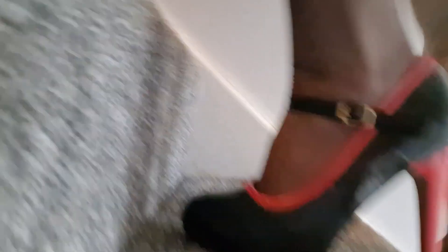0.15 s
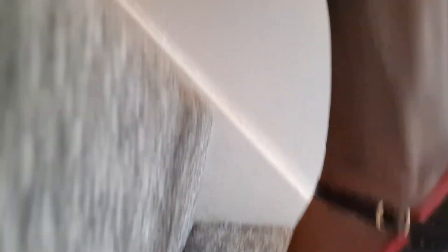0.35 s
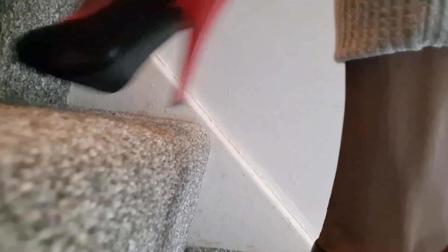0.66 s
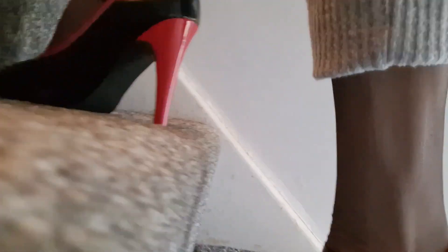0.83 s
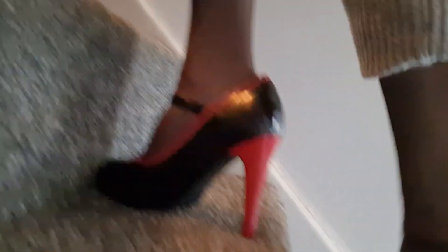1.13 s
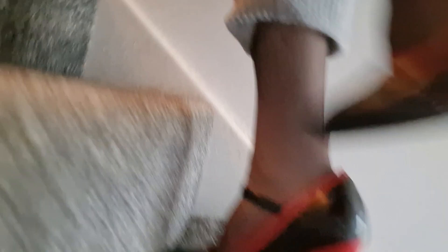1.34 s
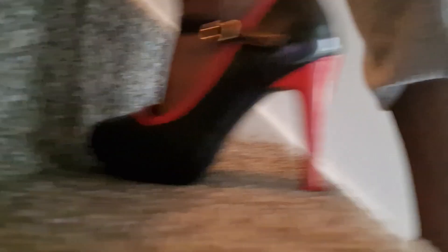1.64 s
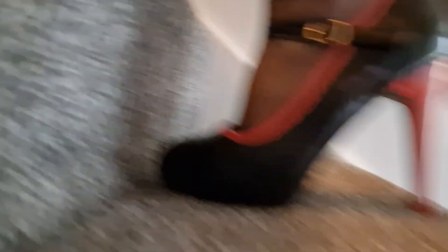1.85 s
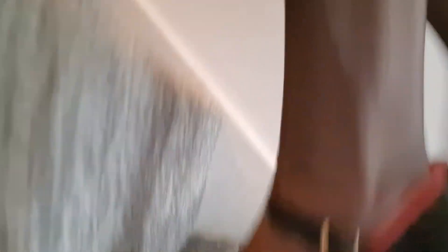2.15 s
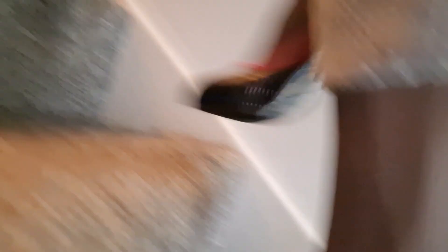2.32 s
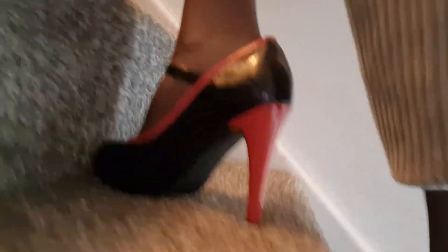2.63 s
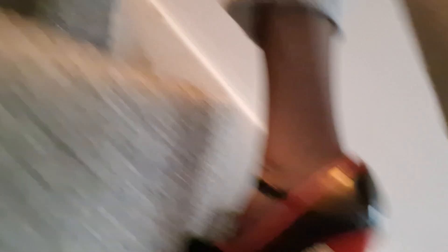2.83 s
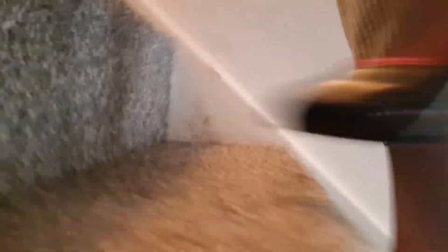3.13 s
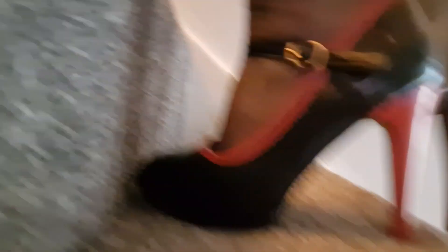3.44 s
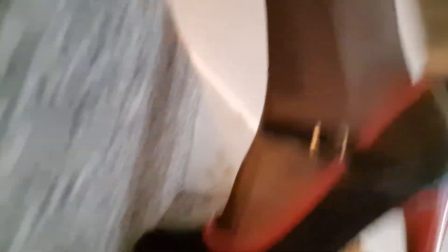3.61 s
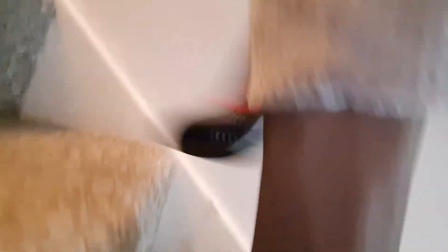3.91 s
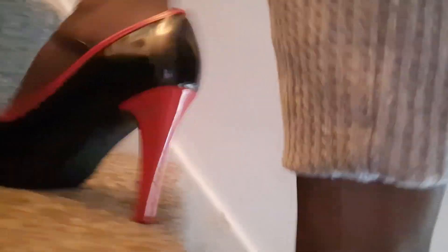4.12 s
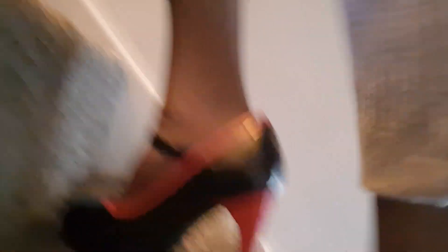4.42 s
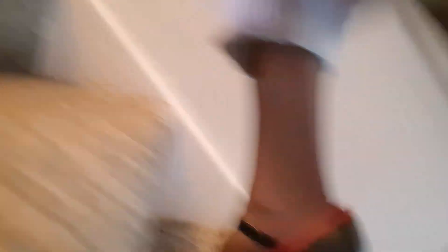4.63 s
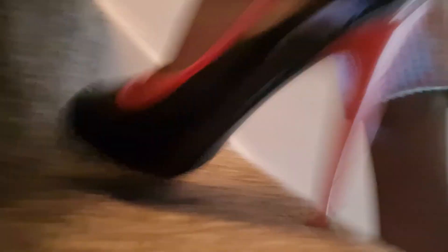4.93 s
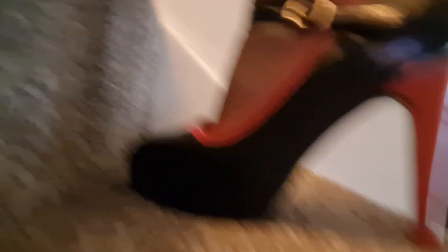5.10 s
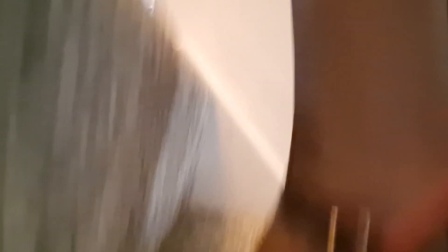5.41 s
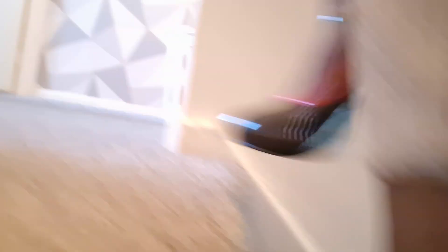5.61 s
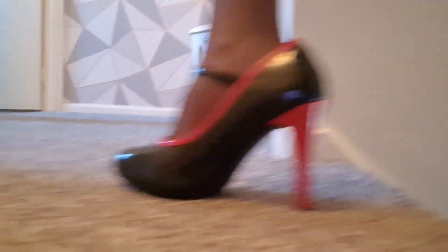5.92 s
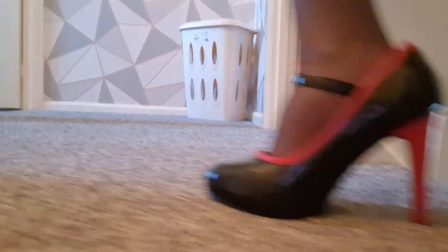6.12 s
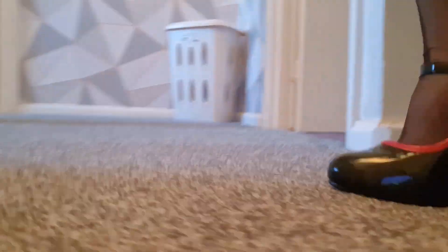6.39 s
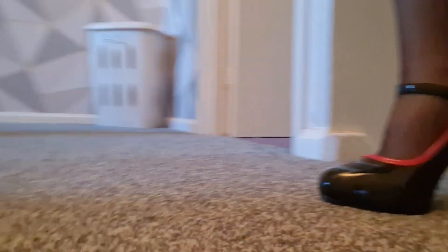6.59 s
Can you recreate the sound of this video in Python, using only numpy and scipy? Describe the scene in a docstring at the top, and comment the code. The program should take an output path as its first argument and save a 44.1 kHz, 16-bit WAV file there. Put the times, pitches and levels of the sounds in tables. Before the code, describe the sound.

Close to the feet in a narrow indoor stairwell, platform high heels climb carpeted wooden stairs at an even walking pace. A strong muffled thud opens at 0 seconds, with a small click at 0.2. Further soft, bassy landings come near 0.85, 1.75, 2.63, 3.43, 4.22 and 5.1, each with low rumbling of the flight and a grainy scuff of carpet pile. Dry wooden knocks and hollow shoe clicks follow irregularly, clearest at 1.93, 3.47 and 5.23; a crisp strap-like snap lands at 3.61. Slipping soles chirr briefly, notably at 4.64 and 5.93. Between steps, knitted trousers swish and nylon hisses very faintly. A lighter, duller step reaches the landing at about 5.95, with a small knock at 6.15. Then the sound settles into faint steady house quiet, with one soft scuff near 6.5 and a barely audible tick at 6.7. Short, close reverberation surrounds the steps.

```python
"""Platform heels on carpeted stairs

Someone in platform high heels climbs a carpeted wooden staircase to a landing, the microphone close to the feet.
Soles land with a muffled thud (struck tread and flight modes) and scuff the pile (grainy coloured noise).
Heels and loaded boards knock and click: struck modes with short noise bursts; slipping soles chirr.
Knitted trouser legs swish, nylon hisses and the flight rumbles, all as swelling noise; a strap snaps once.
The narrow stairwell rings briefly over the steady quiet of the house."""
import sys
import numpy as np
from scipy import signal
from scipy.fft import rfft, irfft, next_fast_len
from scipy.io import wavfile

SR = 44100
rng = np.random.default_rng(int(sys.argv[2]) if len(sys.argv) > 2 else 0)


def transcribe(u):
    """Save the signal u as a 16-bit wav file named by the first command-line argument.

    u: samples, shape (n,) or (channels, n), limited to [-1, 1]; the rate is SR.
    q: integer samples, one column per channel.
    """
    v = np.clip(np.atleast_2d(u).T, -1, 1)
    q = np.round(v * 32767).astype(np.int16)
    wavfile.write(sys.argv[1], SR, q)


N = 297851
TIME = np.arange(N) / SR


def from_db(db):
    """Decibels to gain."""
    return 10 ** (np.asarray(db) / 20)


def rms_one(x):
    """Scale to unit rms."""
    return x / np.sqrt(np.mean(x ** 2) + 1e-20)


def at_hz(points, hz):
    """Read a table on a log-frequency axis."""
    f, value = np.transpose(points)
    return np.interp(np.log(np.maximum(hz, 1)), np.log(f), value)


def add(track, s, sound):
    """Mix a sound into a track from time s on."""
    i = max(int(round(s * SR)), 0)
    track[..., i:i + sound.shape[-1]] += sound[..., :N - i]


def swell(peak_s):
    """A quick rise to 1 and a slower fall."""
    age = TIME[:SR // 2] / peak_s
    return age * np.exp(1 - age)


def stroke(s, half_s):
    """A smooth pass, at its height at time s."""
    return np.exp(-.5 * np.minimum(((TIME - s) / half_s) ** 2, 100))


def surge(s, rise_s, fall_s):
    """A rise to 1 at time s, then a steady dying away."""
    return np.where(TIME < s, stroke(s, rise_s), np.exp(-np.abs(TIME - s) / fall_s))


def pan(stereo, left_db):
    """Tilt the balance: left against right in dB."""
    return stereo * from_db([[left_db / 2], [-left_db / 2]])


def place(sound, left_db, lag_s):
    """Mono to stereo: left_db favours the left port, lag_s delays the right."""
    t = TIME[:len(sound)]
    return pan(np.array([sound, np.interp(t - lag_s, t, sound, left=0)]), left_db)


# Likeness of left and right. Each row: frequency in Hz, correlation.
LEFT_RIGHT_LIKENESS = [(60, 0.95), (150, 0.94), (300, 0.95), (600, 0.2), (1500, 0.05), (4000, 0.061),
                       (15000, 0.093)]


def noise(spectrum):
    """Stereo noise of a given colour, alike in the bass and nearly unrelated in the treble; rms 1."""
    size = next_fast_len(N)
    hz = np.arange(size // 2 + 1) * SR / size
    mid, side = rfft(rng.standard_normal((2, size))) * from_db(at_hz(spectrum, hz))
    alike = np.clip(at_hz(LEFT_RIGHT_LIKENESS, hz), -1, 1)
    spectra = np.sqrt(1 + alike) * mid + np.sqrt(1 - alike) * side * [[1], [-1]]
    return rms_one(irfft(spectra, size)[:, :N])


def grain(per_s, depth_db):
    """Uneven gain of surfaces catching and letting go; rms 1."""
    catches = np.clip(rng.standard_normal(N), -2, 2)
    return rms_one(from_db(depth_db * np.interp(TIME * per_s, np.arange(N), catches)))


def ring(modes, t):
    """Free decay of struck modes."""
    return sum(from_db(db - 60 * t / t60) * np.sin(2 * np.pi * hz * t) for hz, db, t60 in modes)


def soften(sound, contact_s):
    """A rounded push instead of a sharp blow: the longer the contact, the duller the sound."""
    push = np.sin(np.pi * np.minimum(TIME[:int(contact_s * SR) + 2] / contact_s, 1)) ** 2
    return signal.fftconvolve(sound, push / push.sum())[:len(sound)]


def band_pass(sound, low_hz, high_hz):
    """Second-order Butterworth band-pass."""
    return signal.sosfilt(signal.butter(2, [low_hz, high_hz], "band", fs=SR, output="sos"), sound)


# Soles landing or pushing off. Each row: start in seconds, level in dB, contact time in seconds,
# tread pitch in Hz, share passed to the flight in dB.
SOLE_THUDS = [(0.004, -13.5, 0.0067, 101.5, -8.5), (0.162, -28, 0.008, 107, -6),
              (0.853, -20.5, 0.0082, 74, -2), (1.001, -26.5, 0.011, 53.3, -3), (1.661, -37, 0.0094, 51, 2),
              (1.757, -32.5, 0.0081, 109, -2), (1.946, -22, 0.0026, 124, -10.5),
              (2.633, -39.5, 0.0033, 84, 1), (2.748, -38, .003, 118, -11), (3.439, -36.5, 0.011, 60, 9.5),
              (3.491, -38, 0.012, 120, -29), (3.801, -32, 0.0038, 77, -11.5), (4.198, -27, 0.0063, 92, -6),
              (4.257, -19.5, 0.0057, 112, -10.5), (4.732, -31, 0.0017, 84, -11),
              (5.093, -20, 0.0038, 130, -8.5), (5.104, -15, 0.0044, 86, -9.5), (5.23, -40, 0.0021, 122, -4),
              (5.964, -28, 0.0055, 74.6, -18.5)]
# Resonances of the whole flight. Each row: frequency in Hz, level in dB, T60 in seconds.
FLIGHT_MODES = [(37.5, -22, 0.055), (60.2, -1.5, 0.21), (90, -15.5, 0.075), (117, -10.5, 0.67),
                (136.9, -2, 0.24), (171, -5, 0.16), (216, -4, 0.17), (257.6, -5.5, 0.12)]


def thuds(tread_t60_s=0.081, left_db=1.5, lag_s=-.00022):
    """The carpet cushions the sole; the tread bounces briefly and shakes the whole flight."""
    out, t = np.zeros(N), TIME[:SR]
    flight = ring(FLIGHT_MODES, t)
    for s, db, contact_s, tread_hz, flight_db in SOLE_THUDS:
        wood = ring([(tread_hz, 0, tread_t60_s)], t) - from_db(flight_db) * flight
        add(out, s, from_db(db) * soften(wood, contact_s))
    return place(out, left_db, lag_s)


# Hard contacts of heel and boards. Each row: start in seconds, wood level in dB, shoe level in dB,
# shoe pitch in Hz, stem clack in dB, tick in dB, time to full grip in seconds, left against right in dB.
HARD_CONTACTS = [(0.0003, -44.5, -59.5, 1550, -48, -49.5, 0.00057, -6.5),
                 (0.077, -44.5, -57, 1440, -66, -85, 0.001, 8),
                 (0.2098, -40, -48, 1835, -49, -49, 0.00047, 2.5),
                 (0.434, -63, -43.5, 1067, -56, -70, 0.0024, 3),
                 (1.0392, -55, -59, 1470, -76, -64, 0.0012, 4),
                 (1.7417, -47, -61, 990, -75, -70, 0.00098, 14),
                 (1.775, -43, -58.5, 1030, -67, -81, 0.0011, 10),
                 (1.871, -34.5, -51, 1470, -60, -65, 0.0017, 1),
                 (1.884, -50, -49.5, 1480, -56.5, -72, 0.0016, 3),
                 (1.9290, -25.5, -28.5, 1480, -36.5, -33.5, 0.00099, 5.5),
                 (1.948, -36.5, -43, 1600, -58, -43, 0.00074, -7),
                 (2.6322, -51, -68, 2100, -71, -58, 0.00094, 21),
                 (2.7046, -61, -58, 1080, -72, -74, 0.0018, -1),
                 (2.7414, -32, -41.5, 1000, -80, -76, .0009, 6),
                 (2.7961, -47.5, -57, 1630, -60, -56, 0.0007, 1),
                 (2.8621, -58, -72, 1480, -62, -56.5, 0.00045, 1),
                 (3.4373, -34, -55, 830, -69, -71, 0.0016, 11),
                 (3.4702, -24, -40.5, 885, -36.5, -49, .001, 2),
                 (3.4966, -35, -40.5, 956, -52, -47, 0.0016, 1),
                 (3.6010, -30, -42, 1007, -51, -43.5, 0.0017, 2.5),
                 (4.177, -34.5, -66, 1000, -83, -81, 0.0021, 5),
                 (4.382, -46, -55, 990, -54, -54, .0014, -2),
                 (4.5537, -35.5, -64.5, 990, -77, -81, 0.0026, 4),
                 (4.6372, -27.5, -46.5, 960, -54, -77, 0.0019, 3),
                 (4.6540, -44, -56.5, 1570, -68, -84, 0.00047, 17),
                 (5.1157, -36, -50.5, 1800, -40.5, -45, 0.00055, 5),
                 (5.1244, -42, -49, 1850, -48, -59, 0.0014, -7),
                 (5.1907, -56, -76, 2240, -66, -62, .0005, 9),
                 (5.2287, -20, -34.5, 1072, -34, -37, .0011, 3),
                 (5.4705, -42.5, -77, 991, -86, -84, 0.0017, 4),
                 (6.1520, -44.5, -91, 1310, -68, -86, 0.0014, 5),
                 (6.6943, -58.5, -76, 1540, -66, -71, 0.001, -3)]
# Resonances of one board. Each row: frequency in Hz, level in dB, T60 in seconds.
BOARD_MODES = [(206, -15, 0.036), (305.4, -2, 0.025), (369.5, -21.5, 0.087), (436, -11.5, 0.028),
               (505, -15.5, 0.048), (648, -6, 0.03), (830, -25, 0.2), (970, -40, .02)]
# Resonances of the shoe. Each row: multiple of its pitch, level in dB, T60 in seconds.
SHOE_MODES = [(0.501, -5, 0.0091), (0.719, -9, 0.046), (1.002, 3.5, 0.022), (2.12, -9, 0.02),
              (3.05, -19.5, .014)]
# Ring of the heel stem. Each row: frequency in Hz, level against its clack in dB, T60 in seconds.
STEM_MODES = [(3200, 1.5, 0.0051)]
# Clack of the heel stem. Each row: frequency in Hz, relative level in dB per Hz.
STEM_SPECTRUM = [(900, -4), (1800, 0.5), (2200, 2.5), (2650, -6), (2950, 8), (3150, -46), (3550, -4.5),
                 (4200, -15), (5000, -10), (8000, -23)]
# Tick on hard plastic. Each row: frequency in Hz, relative level in dB per Hz.
TICK_SPECTRUM = [(1500, 30), (3500, -19), (4400, 3), (5600, 0.5), (6700, -5), (7800, 8), (8800, 5),
                 (9900, 12), (11500, -7.5), (13500, -8), (16000, -37)]


def knocks(contact_per_grip=1.33, lag_s=.00004, grit_db=3.0, shoe_contact_s=0.00031):
    """Each contact knocks the board and rings the shoe; brief grinding clacks the stem and ticks on hard plastic."""
    out, t = np.zeros((2, N)), TIME[:SR // 2]
    clack, tick = noise(STEM_SPECTRUM), noise(TICK_SPECTRUM)
    board, stem = ring(BOARD_MODES, t), place(ring(STEM_MODES, t), 0, lag_s)
    for s, wood_db, shoe_db, shoe_hz, clack_db, tick_db, grip_s, left_db in HARD_CONTACTS:
        grip = swell(grip_s)
        # a slow grip dulls the board
        wood = place(soften(board, contact_per_grip * grip_s), 0, lag_s)
        # the shoe is struck once, then rattled by the grinding
        shoe_modes = [(shoe_hz * k, db, t60) for k, db, t60 in SHOE_MODES]
        shell = soften(ring(shoe_modes, t), shoe_contact_s)
        grit = from_db(grit_db) * rng.standard_normal((2, len(t))) * grip / np.linalg.norm(grip)
        rattle = signal.fftconvolve(grit, shell[None], axes=1)[:, :len(t)]
        shoe = place(shell, 0, lag_s) + rattle
        start = rng.integers(N - len(t))
        cut = slice(start, start + len(t))
        grinding = (from_db(clack_db) * clack[:, cut] + from_db(tick_db) * tick[:, cut]) * grip
        sound = from_db(shoe_db) * shoe - from_db(wood_db) * wood + from_db(clack_db) * stem + grinding
        add(out, s, pan(sound, left_db))
    return out


# Sole dragging in the pile. Each row: start in seconds, time to peak in seconds, crunch in dB, fibre hiss in dB.
PILE_SCUFFS = [(0.114, 0.015, -88, -65), (0.305, 0.011, -88, -60), (0.501, 0.026, -67.5, -75),
               (0.658, 0.016, -77, -63.5), (0.834, 0.021, -57.5, -68.5), (1.001, 0.029, -61.5, -68),
               (1.283, .012, -62.5, -70), (1.732, 0.01, -53.5, -69.5), (2.198, 0.013, -60.5, -74),
               (2.295, 0.0089, -63, -74), (2.380, 0.0063, -84, -87), (2.624, 0.014, -52.5, -72),
               (3.075, 0.02, -66, -74.5), (3.376, 0.0068, -67.5, -67.5), (3.413, .027, -55, -67.5),
               (3.52, 0.016, -61, -57), (3.616, 0.012, -56, -74), (3.868, 0.025, -63, -80),
               (4.245, 0.0088, -54, -71), (4.382, .013, -64.5, -67.5), (4.636, 0.018, -50.5, -85),
               (4.747, 0.0094, -65.5, -68.5), (5.245, .025, -64, -69), (5.087, 0.022, -49, -62),
               (5.928, 0.014, -55, -64), (6.148, 0.043, -63.5, -88.5), (6.489, 0.019, -68.5, -95)]
# Crushed pile. Each row: frequency in Hz, relative level in dB per Hz.
CRUNCH_SPECTRUM = [(100, -34), (220, 9), (480, -5), (700, -4.5), (1100, -7), (2000, -12), (3500, -18.5),
                   (8000, -30.5)]
# Brushed fibres. Each row: frequency in Hz, relative level in dB per Hz.
HISS_SPECTRUM = [(700, -7), (1800, -3), (4000, -6), (5500, 3), (6600, -2), (7700, 2), (8700, -5),
                 (10000, 2.5), (12000, -6.5), (15500, -9)]


def scuffs(left_db=-1.0):
    """The pile is crushed and brushed: a quick grainy swell that dies as the sole comes to rest."""
    crunch, hiss = np.zeros(N), np.zeros(N)
    for s, peak_s, crunch_db, hiss_db in PILE_SCUFFS:
        add(crunch, s, from_db(crunch_db) * swell(peak_s))
        add(hiss, s, from_db(hiss_db) * swell(peak_s))
    crushed = crunch * noise(CRUNCH_SPECTRUM) * grain(per_s=260, depth_db=3.0)
    brushed = hiss * noise(HISS_SPECTRUM) * grain(per_s=680, depth_db=4.0)
    return pan(crushed + brushed, left_db)


# Sole slipping with a hollow chirr. Each row: start in seconds, time to peak in seconds, level in dB, pitch in Hz.
SOLE_SLIPS = [(0.436, 0.007, -52.5, 1630), (1.735, 0.0046, -63.5, 1700), (2.742, 0.0069, -55.5, 1510),
              (3.417, .0056, -60, 855), (3.555, .002, -50.5, 1290), (3.906, 0.013, -67, 1230),
              (4.249, 0.0087, -59.5, 900), (4.638, 0.0044, -43, 476), (5.933, 0.005, -44, 900),
              (5.958, 0.0045, -50.5, 930)]


def slips(width_octaves=0.5):
    """Stick and slip of the rubber sole keeps one broad resonance of the platform ringing."""
    out, edge = np.zeros((2, N)), 2 ** (width_octaves / 2)
    for s, peak_s, db, hz in SOLE_SLIPS:
        envelope = swell(peak_s)
        # each port's own noise plus a shared part
        friction = rng.standard_normal((2, len(envelope))) + rng.standard_normal(len(envelope))
        chirr = band_pass(friction * envelope, hz / edge, hz * edge)
        add(out, s, from_db(db) * rms_one(chirr) * np.sqrt(np.mean(envelope ** 2)))
    return out


# Snap of the strap. Each row: frequency in Hz, relative level in dB per Hz.
STRAP_SPECTRUM = [(1500, -18), (2600, -9), (4000, -8), (4950, 2), (5400, -2), (5780, 13), (6400, -5),
                  (8500, -11), (10000, 1), (11800, -5.5), (13500, 1), (16000, 0.5)]
SNAP_S, SNAP_PEAK_S, SNAP_DB = 3.6088, .0014, -33.5


def strap(left_db=-4.0):
    """One dry snap, likely an ankle strap flicking over the nylon: a short coloured noise burst."""
    out, flick = np.zeros((2, N)), from_db(SNAP_DB) * swell(SNAP_PEAK_S)
    add(out, SNAP_S, flick * noise(STRAP_SPECTRUM)[:, :len(flick)])
    return pan(out, left_db)


# Strides, also played by shoe_rub, trousers and nylon. Each row: landing in seconds, lead of the passing leg
# in seconds, rumble under the weight in dB, rumble at the push-off in dB, shoe rub in dB, trouser swish in dB,
# nylon hiss in dB.
STRIDE_ROWS = [(0.0, 0.17, -41.5, -62.5, -68.5, -68, -90), (0.852, .11, -45, -57, -73, -70, -71),
               (1.742, 0.14, -41.5, -54, -63, -76, -82), (2.631, .10, -40.5, -62, -77, -80.5, -79.5),
               (3.432, 0.18, -35.5, -52.5, -64, -84.5, -72), (4.218, 0.13, -38, -48.5, -65.5, -73, -68.5),
               (5.099, .16, -39, -64, -63, -71.5, -70.5), (5.93, .14, -54.5, -66.5, -74.5, -112, -106)]
# Rumbling flight. Each row: frequency in Hz, relative level in dB per Hz.
RUMBLE_SPECTRUM = [(15, -13), (30, 1.5), (45, 1), (75, 0), (100, -1), (111, -9.5), (118, 6.5), (125, 5.5),
                   (140, -15), (200, -13), (300, -22), (600, -58)]
# delays count from the landing
SETTLE_S, SETTLE_RISE_S, CALM_S = 0.056, 0.04, 0.11
PUSH_OFF_S, PUSH_OFF_HALF_S = .58, 0.14
RESTING_RUMBLE_DB = -64.5


def flight_rumble():
    """The flight rumbles as weight settles and as the lower foot pushes off, and never quite comes to rest."""
    level = from_db(RESTING_RUMBLE_DB)
    for s, _, weight_db, push_db, *_ in STRIDE_ROWS:
        level = level + from_db(weight_db) * surge(s + SETTLE_S, SETTLE_RISE_S, CALM_S)
        level = level + from_db(push_db) * stroke(s + PUSH_OFF_S, PUSH_OFF_HALF_S)
    return level * noise(RUMBLE_SPECTRUM) * grain(per_s=18, depth_db=2.0)


# Shoe rubbing. Each row: frequency in Hz, relative level in dB per Hz.
RUB_SPECTRUM = [(150, -11), (300, 11.5), (420, -4.5), (560, -15.5), (750, 0.5), (1100, -12), (1800, -10),
                (2300, -11), (3200, -20.5), (6000, -33)]
ROLL_S, ROLL_RISE_S, ROLL_FADE_S = 0.21, 0.13, .17


def shoe_rub():
    """The foot rolls in its shoe after each landing; the grainy rubbing swells and fades."""
    level = sum(from_db(rub_db) * surge(s + ROLL_S, ROLL_RISE_S, ROLL_FADE_S)
                for s, _, _, _, rub_db, _, _ in STRIDE_ROWS)
    return level * noise(RUB_SPECTRUM) * grain(per_s=59, depth_db=3.0)


# Swishing knit. Each row: frequency in Hz, relative level in dB per Hz.
SWISH_SPECTRUM = [(1000, 5), (2500, 2), (4100, 1.5), (5500, 3.5), (6500, 0.5), (7500, 4.5), (8600, -8),
                  (9900, 4), (11500, -20), (15500, -15)]
SWING_HALF_S = 0.14
FLAP_S, FLAP_HALF_S, FLAP_DB = 0.34, 0.13, -7  # dB against the swish


def trousers():
    """The knit swishes as the leg passes and flaps back after each landing."""
    level = 0
    for s, lead_s, _, _, _, swish_db, _ in STRIDE_ROWS:
        flap = from_db(FLAP_DB) * stroke(s + FLAP_S, FLAP_HALF_S)
        level = level + from_db(swish_db) * (stroke(s - lead_s, SWING_HALF_S) + flap)
    return level * noise(SWISH_SPECTRUM) * grain(per_s=500, depth_db=3.5)


# Sheen of the nylon. Each row: frequency in Hz, relative level in dB per Hz.
SHEEN_SPECTRUM = [(4000, -24), (5700, -2), (6800, -10), (8700, 2), (9900, 5.5), (12500, 1), (16000, 3.5)]
NYLON_HALF_S = 0.087


def nylon():
    """Fine threads hiss in the top treble as one leg passes the other."""
    level = sum(from_db(db) * stroke(s - lead_s, NYLON_HALF_S) for s, lead_s, *_, db in STRIDE_ROWS)
    return level * noise(SHEEN_SPECTRUM) * grain(per_s=160, depth_db=1.0)


# Background of the house. Each row: frequency in Hz, relative level in dB per Hz.
HOUSE_SPECTRUM = [(100, -15), (290, -3), (350, 2.5), (430, -8.5), (800, -4.5), (1400, -11.5), (2300, -10.5),
                  (3500, -19.5), (5500, -20), (8500, -28.5), (9900, -20), (11500, -31.5), (15500, -27)]
HOUSE_DB = -74


def house():
    """Steady coloured noise of the quiet house."""
    return from_db(HOUSE_DB) * noise(HOUSE_SPECTRUM)


def side_wall(x, left_s=.0023, right_s=0.005, echo_db=-12.5):
    """The bare wall beside the feet returns one close echo to each port."""
    echo = [np.interp(TIME - lag_s, TIME, port, left=0) for lag_s, port in zip((left_s, right_s), x)]
    return x + from_db(echo_db) * np.array(echo)


# Stairwell reverberation. Each row: frequency in Hz, reverberant against direct energy in dB.
WELL_LEVELS = [(100, -34.5), (250, -8.5), (500, -4.5), (1000, -14), (2000, -14), (4000, -7.5), (12000, -21)]
# Stairwell decay. Each row: frequency in Hz, T60 in seconds.
WELL_DECAYS = [(120, 0.69), (400, 0.3), (1000, 0.16), (3000, 0.097), (12000, 0.28)]


def stairwell(x, build_s=0.012):
    """Reflections build up between the close walls and die away, each band at its own rate."""
    t, response = TIME[:SR // 2], 0
    edges_hz = 90 * 2 ** (np.arange(12) * 2 / 3)
    for low_hz, high_hz in zip(edges_hz, edges_hz[1:]):
        hz = np.sqrt(low_hz * high_hz)
        band = band_pass(rng.standard_normal((2, len(t))), low_hz, high_hz)
        fade = np.minimum(t / build_s, 1) * from_db(-60 * t / at_hz(WELL_DECAYS, hz))
        gain = from_db(at_hz(WELL_LEVELS, hz)) / np.sqrt(np.sum(fade ** 2))
        response = response + band * fade * gain
    return signal.fftconvolve(x, response, axes=1)[:, :N]


def scene():
    """Footfalls, clothing and house in the stairwell; the rumble of the flight stays dry."""
    contacts = knocks() + scuffs() + slips() + strap()
    brushing = shoe_rub() + trousers() + nylon()
    steps = thuds() + side_wall(contacts + brushing + house())
    return steps + stairwell(steps) + flight_rumble()


BASS_CUT_HZ, CUTOFF_HZ = 22, 16000


def record(dry):
    """The microphone loses the deepest bass; the top is cut."""
    thin = signal.sosfilt(signal.butter(2, BASS_CUT_HZ, "high", fs=SR, output="sos"), dry)
    return signal.sosfilt(signal.ellip(10, .2, 70, CUTOFF_HZ, fs=SR, output="sos"), thin)


dry = scene()
out = record(dry)
transcribe(out)
```